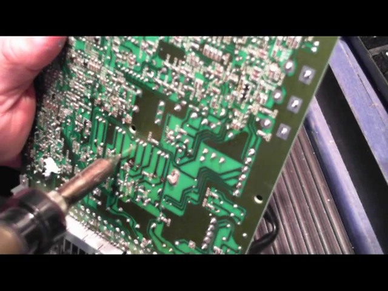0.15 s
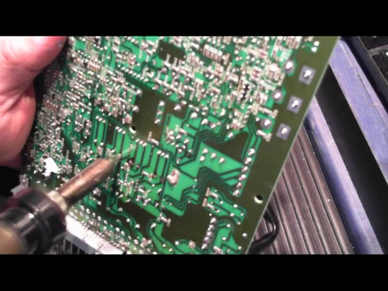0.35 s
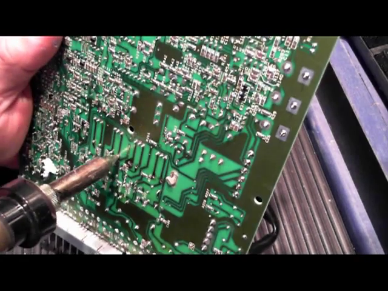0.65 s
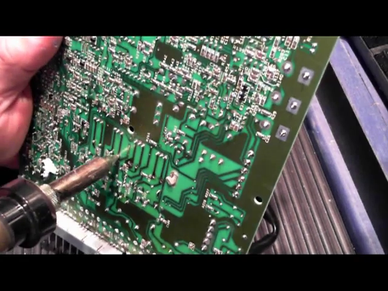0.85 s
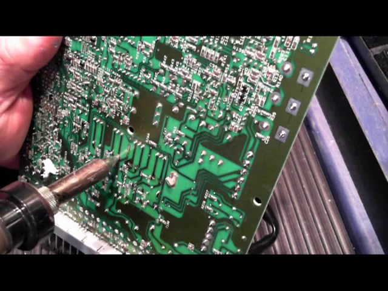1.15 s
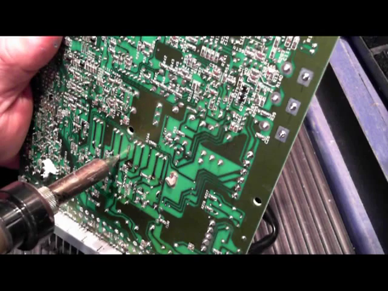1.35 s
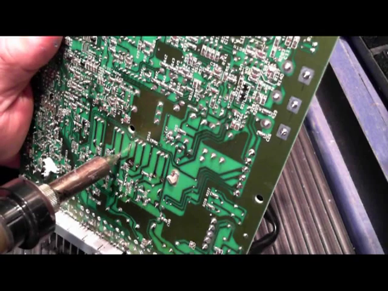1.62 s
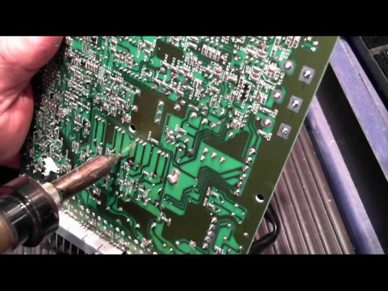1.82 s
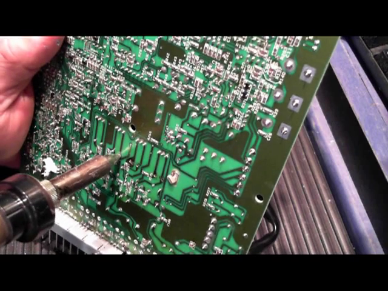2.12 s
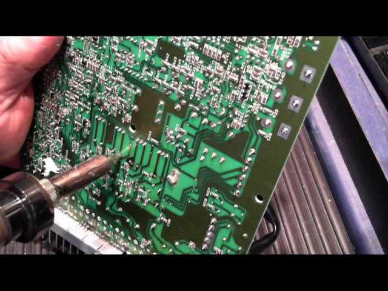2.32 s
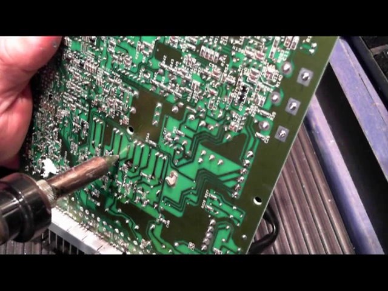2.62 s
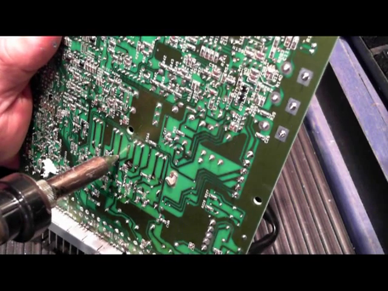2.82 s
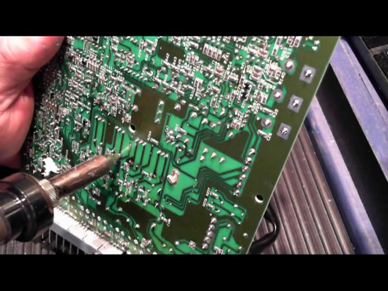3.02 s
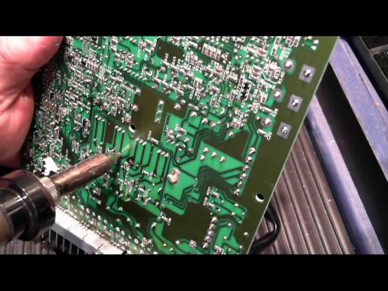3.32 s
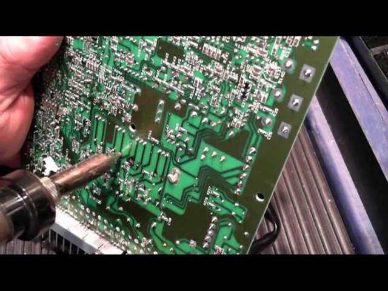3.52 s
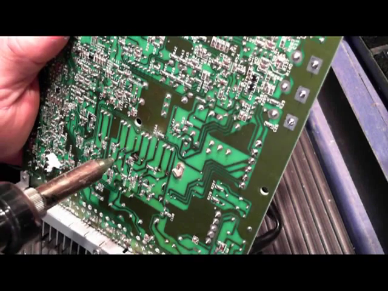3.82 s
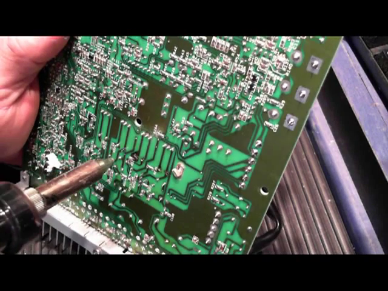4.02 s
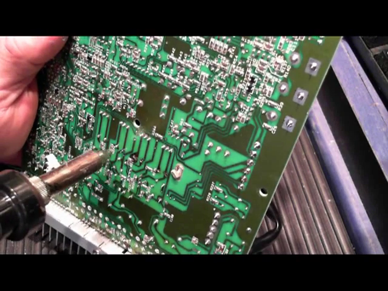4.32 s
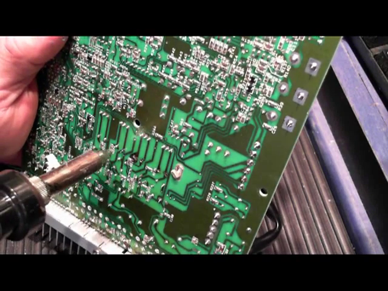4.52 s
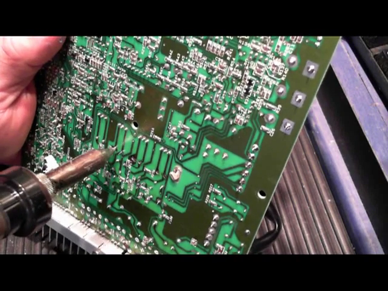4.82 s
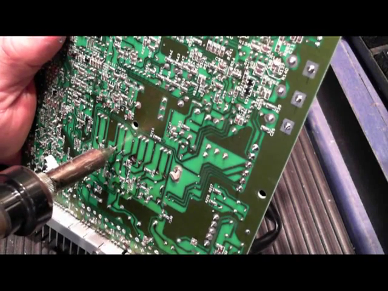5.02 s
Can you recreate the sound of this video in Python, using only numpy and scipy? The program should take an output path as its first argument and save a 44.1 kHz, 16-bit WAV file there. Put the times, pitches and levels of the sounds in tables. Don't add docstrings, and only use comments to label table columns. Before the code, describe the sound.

A desoldering tool works on a circuit board at a bench, heard close in a small, fairly dry workshop. A faint broadband fan hum runs throughout, with low lumps of moving air buffeting the microphone, except for a calmer spell around 3.3 to 4.2 s. At about 0.25 s the metal tip scuffs the board, with a thin ring then a gritty drag; at 0.55 s come two tiny bites. A faint tick falls at 0.9 s. At 1.15 s the trigger clicks, followed by a tight cluster of bright valve snaps and knocking pump strokes. The pump runs up within 0.3 s, peaks, then sags slightly into a steady, rough buzzing whine near 88 pulses a second, with bright overtones and pulsing hiss. At 2.61 s it clicks off, braking quickly with slowing, fading taps. Isolated small ticks follow at 3.3, 4.2, 4.3, 4.6 and 4.9 s.

```python
import sys
import numpy as np
from scipy import signal
from scipy.fft import rfft, irfft, next_fast_len
from scipy.io import wavfile
from scipy.ndimage import uniform_filter1d, map_coordinates

SR = 44100
rng = np.random.default_rng(int(sys.argv[2]) if len(sys.argv) > 2 else 0)


def natural_amplitude(level_db):
    exponent = np.asarray(level_db, float) / 20
    return 10 ** exponent


def pcm_store(signal):
    levels = np.round(np.clip(np.atleast_2d(signal), -1, 1) * 32767)
    wavfile.write(sys.argv[1], SR, levels.astype(np.int16).T)


N = 227203
T_S = np.arange(N) / SR
ON_S, OFF_S, REST_S = 1.172, 2.612, 2.85
FLOW_S = ON_S + 0.018
LOADED_HZ = 88.1


def unit(x):
    return x / np.sqrt(np.mean(x ** 2) + 1e-20)


def along(points, hz):
    f, v = np.transpose(points)
    return np.interp(np.log(hz + 1), np.log(f + 1), v)


def wobble(rate_hz, size=N):
    knots = rng.standard_normal(int(size * rate_hz / SR) + 4)
    return map_coordinates(knots, [np.arange(size) * rate_hz / SR])


def filtered(x, response):
    m = next_fast_len(N + SR // 2)
    return irfft(rfft(x, m) * response(np.fft.rfftfreq(m, 1 / SR)), m)[:N]


def peak(f, hz, width_hz):
    return 1j * f * width_hz / (hz * hz - f * f + 1j * f * width_hz)


def noise(spectrum):
    return unit(filtered(rng.standard_normal(N), lambda hz: natural_amplitude(along(spectrum, hz))))


def evened(x, window_s):
    return x / np.sqrt(np.abs(uniform_filter1d(x ** 2, int(window_s * SR))) + 0.063)


def swell(start_s, hold_s, rise_db_per_s, fall_db_per_s):
    early_s = np.maximum(start_s - T_S, 0)
    late_s = np.maximum(T_S - start_s - hold_s, 0)
    return natural_amplitude(-abs(rise_db_per_s) * early_s - abs(fall_db_per_s) * late_s)


def ring(hz, t60_s, size):
    t = np.arange(size) / SR
    return np.sin(2 * np.pi * hz * t) * natural_amplitude(-60 * t / t60_s) * (1 - np.exp(-t * hz))


def shop(x):
    # frequency in Hz, t60 in s
    decay_times = [(300, 0.083), (1900, 0.35), (3000, 0.2), (9000, 0.18)]
    hz, t, z = signal.stft(rng.standard_normal(SR // 2), SR, nperseg=256)
    decay = natural_amplitude(-60 * t / along(decay_times, hz)[:, None])
    tail = signal.istft(z * decay, SR, nperseg=256)[1]
    return signal.fftconvolve(np.pad(x, (300, 0)), tail / np.linalg.norm(tail))[:N]


def far_fan():
    # frequency in Hz, level in dB per Hz
    fan_colour = [(71, -40), (120, -3), (148, -8.5), (254, -12), (428, -11.5), (594, -13.5), (667, -8),
                  (720, -12.5), (1280, -5), (2120, -2), (3000, -10), (4760, -13), (6480, -24),
                  (10100, -28.5), (12000, -31), (15600, -65), (22000, -120)]
    # frequency in Hz, level in dB
    hum_tones = [(1303, -72.5), (1733, -71), (2099, -70), (2509, -74.5), (9900, -89.5)]
    out = natural_amplitude(-57 + 0.13 * wobble(6.64)) * noise(fan_colour)
    for hz, db in hum_tones:
        gain = natural_amplitude(db + 1 + 3.7 * wobble(8))
        out += gain * np.sin(2 * np.pi * hz * T_S + 0.53 * wobble(40))
    return out


def moving_air():
    # centre in s, half width in s, push in dB, flutter relative to push in dB
    air_lumps = [(.03, 0.045, -29.5, -19), (.12, 0.032, -32.5, -16), (.24, .07, -41.5, -11.5),
                 (.36, .04, -39.5, -24), (.52, 0.048, -33.5, -29), (.79, 0.037, -41, -37),
                 (1.86, 0.055, -32, -13.5), (2.01, .04, -33.5, 0.5), (2.12, 0.051, -37.5, -0.5),
                 (2.2, 0.026, -29, -10), (2.28, 0.056, -41.5, 1.5), (2.42, 0.057, -34, -7),
                 (2.53, 0.04, -38, -10), (2.64, 0.061, -38.5, -4), (2.86, 0.066, -43, -32),
                 (3.25, 0.13, -52, -16), (3.65, 0.08, -69, -12), (3.93, .06, -70, -17),
                 (4.287, 0.03, -29, -18), (4.409, 0.068, -33, -12.5), (4.57, 0.053, -37.5, -5.5),
                 (4.67, 0.048, -34, -10.5), (4.77, 0.057, -41.5, -1), (4.89, 0.057, -39, -23),
                 (5.07, 0.05, -35.5, -18), (5.14, 0.029, -44, -9)]
    # frequency in Hz, level in dB per Hz
    push_colour = [(7.1, -12.5), (12, 0.5), (32, -9), (70, -35.5), (91, -44), (150, -120)]
    # frequency in Hz, level in dB per Hz
    flutter_colour = [(32, -18.5), (55, 5), (113, -14), (145, -22.5), (260, -34.5), (340, -70), (570, -120)]
    calm_push_db, calm_flutter_db = -57.5, -70
    centre_s, half_s, push_db, flutter_db = np.transpose(air_lumps)
    coarse_s = T_S[::64]
    shapes = np.exp(-((coarse_s[:, None] - centre_s) / half_s) ** 2)
    push_gain = np.interp(T_S, coarse_s, natural_amplitude(calm_push_db) + shapes @ natural_amplitude(push_db))
    flutter_gain = np.interp(T_S, coarse_s, natural_amplitude(calm_flutter_db) + shapes @ natural_amplitude(push_db + flutter_db))
    slow = unit(evened(noise(push_colour), 0.1))
    push = unit(slow + 0.04 * (slow ** 2 - 1))
    flutter = unit(evened(noise(flutter_colour), 0.067) * natural_amplitude(0.83 * wobble(33)))
    return push_gain * push + flutter_gain * flutter


def board_ticks():
    # start in s, peak in dB, three ring frequencies in Hz
    tick_events = [
        (0.905, -32, 1380, 1960, 2970),
        (3.324, -25.5, 1090, 2340, 3000),
        (4.193, -31.5, 1430, 1950, 3140),
        (4.277, -29, 1520, 1810, 3180),
        (4.614, -28, 1430, 2220, 3160),
        (4.905, -27.5, 1630, 2570, 3130),
    ]
    # frequency in Hz, level in dB per Hz
    tap_colour = [(600, -15), (1000, -6), (2200, 4), (3300, -20), (5000, -16), (12000, -39)]
    out, t, grain = np.zeros(N + 6000), np.arange(6000) / SR, noise(tap_colour)
    onset = 1 - np.exp(-t / 0.002)
    for s, db, *rings_hz in tick_events:
        i = round(s * SR)
        crack = grain[i:][:len(t)] * natural_amplitude(-60 * t / 0.02) * onset
        rings = sum(12 / np.sqrt(hz) * ring(hz, 0.027, len(t)) * onset for hz in rings_hz)
        out[i:][:len(t)] += natural_amplitude(db - 5.5) * (0.5 * crack + rings)
    return out[:N]


def scuffs():
    # start in s, hold in s, level in dB, board relative in dB, tip ring relative in dB
    slip_events = [
        (0.228, 0.023, -53.5, -2, 14.5),
        (0.263, 0.026, -47.5, 3, -8),
        (.522, .003, -68, -12, -10),
        (0.541, 0.0018, -49, 2, -16),
        (0.571, .002, -45, 4, -18),
    ]
    # frequency in Hz, level in dB per Hz
    copper_colour = [(1760, -27), (3000, -7), (5330, -6.5), (6450, -1.5), (7330, -12), (8000, -7),
                     (10000, -18), (11100, -11.5), (12000, -28), (15600, -55), (22000, -120)]
    # frequency in Hz, width in Hz, level in dB
    board_modes = [(1770, 200, -4.5), (2200, 110, 5), (2550, 150, 1.5), (3150, 260, -1.5)]
    grit = natural_amplitude(1.4 * wobble(400))

    def board_response(f):
        return sum((-1) ** k * natural_amplitude(db) * peak(f, hz, w) for k, (hz, w, db) in enumerate(board_modes))

    direct = noise(copper_colour) * grit
    board = unit(filtered(rng.standard_normal(N) * grit, board_response))
    tip = unit(filtered(rng.standard_normal(N) * grit,
                        lambda f: peak(f, 4250, 500) * peak(f, 4320, 700)))
    out = np.zeros(N)
    for s, hold_s, db, board_db, tip_db in slip_events:
        rise_db_per_s = 3500 if tip_db > 0 else 1300
        slide = natural_amplitude(1.3) * direct + natural_amplitude(board_db) * board + natural_amplitude(tip_db - 5.5) * tip
        out += natural_amplitude(db) * swell(s, hold_s, rise_db_per_s, 850) * slide
    return out


def trigger():
    # start in s, peak in dB, main ring in Hz, crack decay scale in s
    snap_events = [
        (1.1511, -19, 5510, 0.11),
        (1.1806, -22, 4600, 0.05),
        (1.1865, -13, 4550, 0.037),
        (1.1995, -13.5, 4540, 0.02),
        (2.608, -15.5, 5960, 0.036),
    ]
    # frequency in Hz, level in dB per Hz
    snap_colour = [(1200, -13), (2200, 8.5), (4000, 9), (7500, 5), (9000, -20), (12000, -38)]
    out, t, grain = np.zeros(N + 6000), np.arange(6000) / SR, noise(snap_colour)
    for s, db, hz, t60_s in snap_events:
        i = round(s * SR)
        decay = natural_amplitude(-60 * t / (0.33 * t60_s)) + 0.082 * natural_amplitude(-60 * t / (1.5 * t60_s))
        crack = grain[i:][:len(t)] * decay * (1 - np.exp(-t / 0.00043))
        rings = 1.3 * ring(hz, 0.016, len(t)) + 0.5 * ring(1.38 * hz, 0.011, len(t))
        out[i:][:len(t)] += natural_amplitude(db - 9) * (0.6 * crack + rings)
    return out[:N]


def pump_strokes():
    # start in s, peak in dB, low thud relative in dB
    stroke_events = [(1.1876, -26, -7.5), (1.198, -24.5, -9), (1.2024, -22, -5), (1.2164, -22, -8),
                     (1.2386, -20, -19), (1.2714, -13.5, -17.5), (2.6224, -15.5, -14), (2.6425, -22, -12.5),
                     (2.6668, -38, 2.5), (2.6874, -38, -22), (2.7044, -47, -10)]
    # frequency in Hz, level in dB, t60 in s
    case_rings = [(497.3, 11, 0.026), (936, 9, .024), (1907, 4.5, 0.04), (2030, 0, 0.035), (1620, -5, .022),
                  (2500, -6, .025)]
    out, size = np.zeros(N + 6000), 6000
    for s, db, thud_db in stroke_events:
        knock = np.zeros(size)
        for hz, ring_db, t60_s in case_rings:
            gain_db = ring_db + (hz < 1200) * thud_db + 4.3 * wobble(210, size=size)
            knock += natural_amplitude(gain_db) * ring(hz, t60_s, size)
        out[round(s * SR):][:size] += natural_amplitude(db - 8.5) * knock
    return out[:N]


def housing(f):
    # frequency in Hz, width in Hz, boost in dB
    case_modes = [(470, 39, 2.5), (896, 68, 4), (1335, 240, 6), (1910, 12, 6), (2440, 130, -0.5),
                  (2640, 180, 3), (4600, 590, -0.5), (5950, 260, 2), (10300, 1300, -0.5)]
    return np.prod([1 + (natural_amplitude(db) - 1) * peak(f, hz, w) for hz, w, db in case_modes], axis=0)


def pump_air(running, off_s, slower_hz, load_hz, turn):
    # frequency in Hz, level in dB per Hz
    air_colour = [(120, -60), (200, -18), (357, -16), (398, -15), (444, -4), (580, -23.5), (703, -4),
                  (1230, -8), (1450, 5.5), (2570, 9.5), (3600, -8), (4680, -6), (7920, -120)]
    # frequency in Hz, level in dB per Hz
    jet_colour = [(1880, -23), (3200, 0.5), (3460, -1.5), (4170, -5), (4530, -2.5), (5560, -6.5),
                  (6040, -5.5), (7020, -11.5), (8240, -14), (8710, -19), (9460, -18.5), (10300, -30),
                  (12000, -33.5), (15600, -64), (22000, -120)]
    flow_db = -26.5 + 0.1558 * load_hz + 0.03 * np.minimum(slower_hz, 0)
    vent = swell(FLOW_S, OFF_S + 0.015 - FLOW_S, 1496, 700)
    leak = (off_s > 0) * natural_amplitude(-45.5 - 90 * off_s)
    flow = running * (natural_amplitude(flow_db) * vent + leak)

    throb = np.clip(0.17 + 0.0041 * slower_hz, 0, 1)
    strength = natural_amplitude(1.6 * wobble(100) + 0.6 * wobble(35))
    puffs = (1 + throb * (np.cos(turn) + 0.18 * np.cos(2 * turn))) * strength
    body = unit(filtered(noise(air_colour), housing)) * puffs
    jet = unit(filtered(noise(jet_colour), housing))
    jet *= (1 + 1.06 * throb * np.cos(turn - 1.2)) * natural_amplitude(0.59 * wobble(200))
    fizz = unit(filtered(rng.standard_normal(N), lambda f: peak(f, 10970, 1600) ** 4))
    fizz *= natural_amplitude(-41.5 + 0.3 * load_hz) * natural_amplitude(2.4 * wobble(38))
    air = flow * (natural_amplitude(-4.5) * body + natural_amplitude(-8 - 0.24 * load_hz) * jet + fizz)

    cavity = filtered(air, lambda f: peak(f, 1830, 45) + peak(f, 2000, 40) + peak(f, 2036, 45))
    shake = unit(filtered(puffs * rng.standard_normal(N),
                          lambda f: peak(f, 470, 62) - peak(f, 1050, 170) + 0.5 * peak(f, 630, 150)))
    shake_gain = natural_amplitude(-58.5 + 0.5646 * slower_hz) * swell(FLOW_S, OFF_S - FLOW_S, 610, 561)
    return air + running * shake_gain * shake + natural_amplitude(-7) * cavity


def pump_whine(running, off_s, slower_hz, turn):
    # multiple of shaft speed, level in dB
    shaft_orders = [(1, -19.5), (2, -23.5), (3, -23.5), (4, -13), (5, -9), (6, -19), (7, -15.5), (8, -5),
                    (9, -19.5), (10, -13.5), (11, -14), (12, -11), (13, -9.5), (14, -30), (15, -23),
                    (16, 0.5), (17, -3.5), (18, -1.5), (19, -0.5), (20, -23), (21, -33), (22, -3.5),
                    (23, 3), (24, -9), (25, 0), (26, -44), (27, -2.5), (28, 3), (29, -7), (30, -4),
                    (31, -4), (32, -6.5), (33, -6), (34, -4.5), (35, -16), (36, -27), (37, -22), (38, -8.5),
                    (39, -8.5)]
    turn = turn[running]
    seated = np.maximum(swell(1.8, REST_S, 30, 0), natural_amplitude(-9))[running]
    orders = np.zeros(len(turn))
    for k, db in shaft_orders:
        gain = natural_amplitude(db) * natural_amplitude((0.6 + 0.06 * k) * wobble(18, size=len(turn)))
        drift = 0.014 * k * wobble(30, size=len(turn))
        phase = k * turn - 0.11 * k * k + rng.normal(0, 0.9) + drift
        orders += gain * (seated if k > 13 else 1) * np.sin(phase)
    whine = np.zeros(N)
    whine[running] = orders
    whine = filtered(whine, lambda f: 1 + 1.47 * peak(f, 473, 73))
    whine_db = -42 - 0.37 * np.maximum(slower_hz, 0) - 300 * off_s
    return running * natural_amplitude(whine_db + 6.5) * whine


def pump():
    # time in s, speed in Hz
    speed_points = [(1.172, 57.2), (1.236, 67.73), (1.3, 78), (1.388, 87.76), (1.452, 92), (1.56, 92.86),
                    (1.712, 90.5), (1.91, 88.56), (2.612, 87.08)]
    coast_hz, brake_s = 29.2, 0.03
    running = (T_S > ON_S) & (T_S < REST_S)
    off_s = np.maximum(T_S - OFF_S, 0)
    powered_hz = np.interp(T_S, *np.transpose(speed_points))
    shaft_hz = coast_hz + (powered_hz - coast_hz) * np.exp(-off_s / brake_s)
    slower_hz = LOADED_HZ - shaft_hz
    load_hz = np.clip(LOADED_HZ - powered_hz, 0, None)
    turn = 2 * np.pi * np.cumsum(shaft_hz * (1 + 0.00076 * wobble(29.76))) / SR
    whine = pump_whine(running, off_s, slower_hz, turn)
    return whine, pump_air(running, off_s, slower_hz, load_hz, turn)


def scene():
    background = far_fan() + moving_air()
    scuff = scuffs()
    whine, air = pump()
    tool = air + board_ticks() + trigger() + pump_strokes()
    room = natural_amplitude(-10) * shop(tool + 0.86 * scuff + 0.14 * whine)
    return (whine + tool + scuff + room + background)[None]


def band_limit(x):
    return signal.sosfilt(signal.butter(12, 12240, fs=SR, output="sos"), x)


def record(dry):
    start = np.clip(T_S / 0.008, 0, 1)
    mix = filtered(dry[0] * start, lambda hz: hz < 12000)[None]
    return band_limit(mix)


dry = scene()
out = record(dry)
pcm_store(out)
```